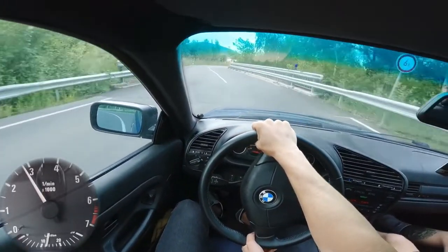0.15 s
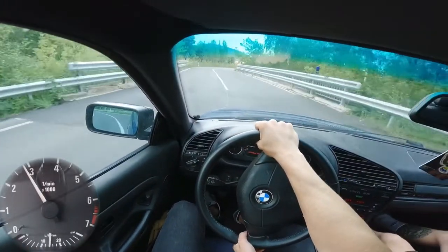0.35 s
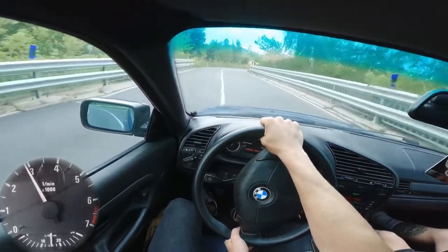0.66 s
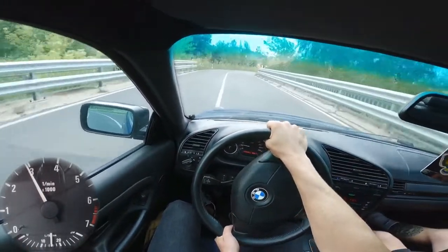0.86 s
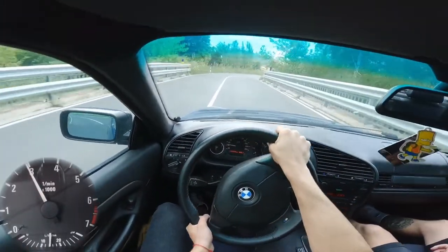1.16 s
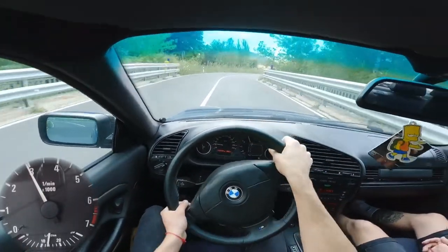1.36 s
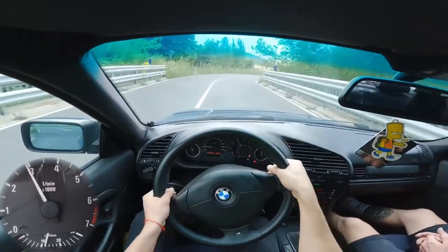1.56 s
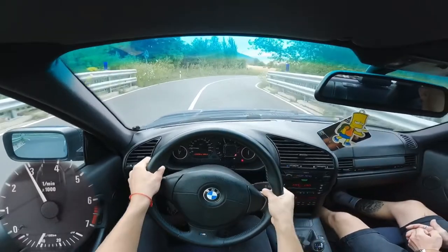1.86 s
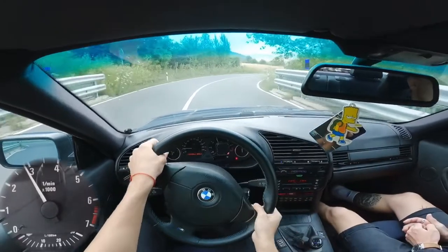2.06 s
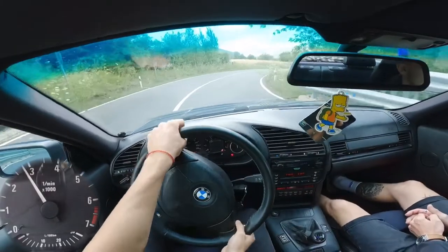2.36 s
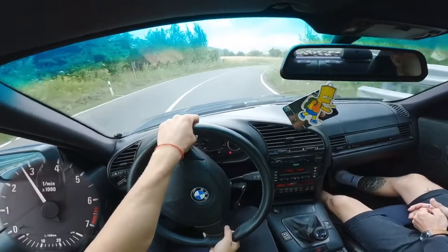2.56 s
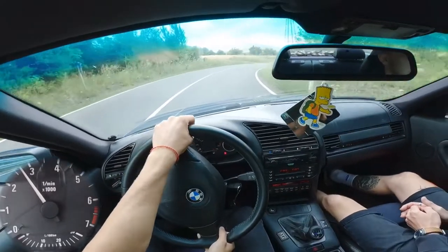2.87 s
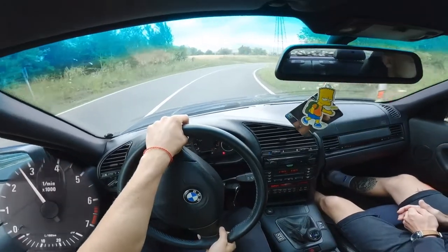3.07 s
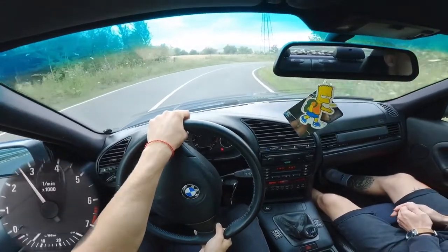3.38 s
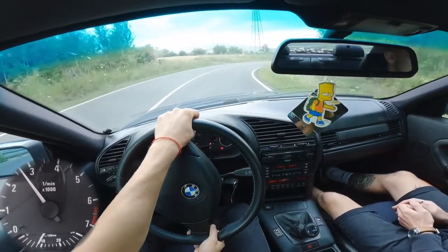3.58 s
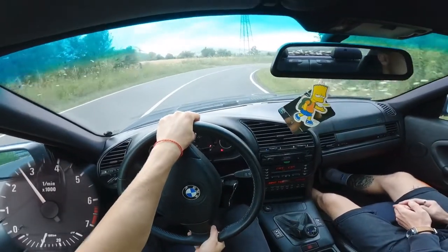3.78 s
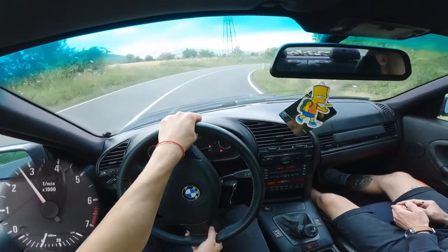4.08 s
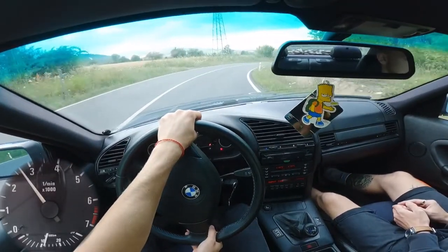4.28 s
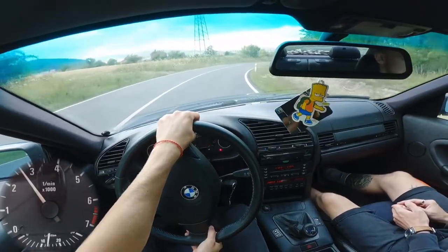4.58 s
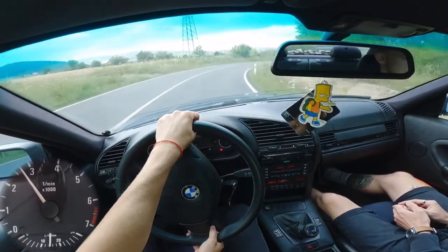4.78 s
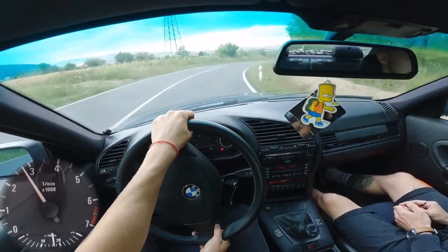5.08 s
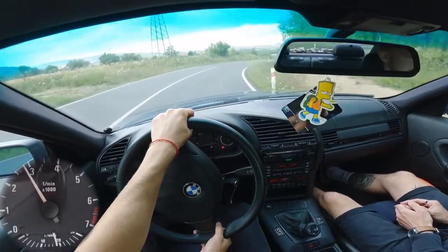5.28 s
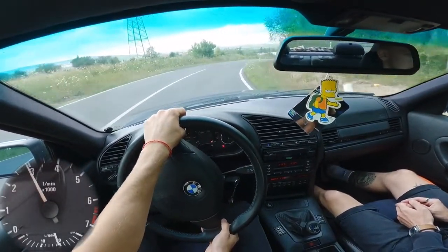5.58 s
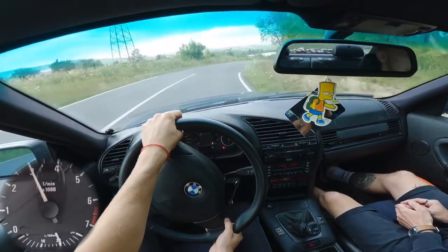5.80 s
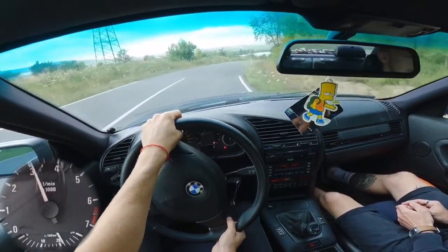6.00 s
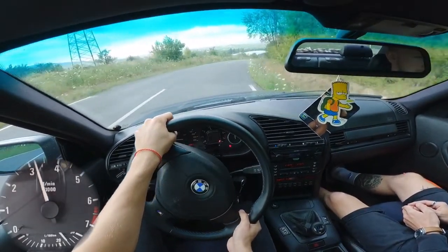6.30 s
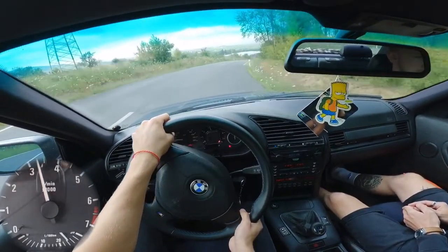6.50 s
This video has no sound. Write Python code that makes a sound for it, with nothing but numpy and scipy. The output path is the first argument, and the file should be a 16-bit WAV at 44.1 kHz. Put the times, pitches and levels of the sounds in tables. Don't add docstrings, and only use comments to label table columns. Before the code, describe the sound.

A boomy car interior: soft road rumble and air roar beneath a buzzing six-cylinder drone. Two dull knocks from the road come early, the second just before a stumbling, burbling throttle lift. The boom resumes and sags slightly in pitch, a shorter lift sputters into subdued coasting, and finally the engine gathers revs, growing louder, raspier and brighter until the end. Two microphone ports sit near the driver's head.

```python
import sys
import numpy as np
from scipy import signal
from scipy.io import wavfile
from scipy.ndimage import uniform_filter1d

SR = 44100
rng = np.random.default_rng(int(sys.argv[2]) if len(sys.argv) > 2 else 0)


def transcribe(signal):
    frames = np.atleast_2d(signal).T
    limited = np.clip(frames, -1, 1)
    pcm = np.round(limited * 32767).astype(np.int16)
    wavfile.write(sys.argv[1], SR, pcm)


def amplitude_ratio(level_db):
    exponent = np.asarray(level_db, float) / 20
    return 10 ** exponent


N = 293265
T = np.arange(N) / SR
COARSE = np.arange(0, N, 64)

# t/s, pulse rate of one three-cylinder bank f/Hz, firing boom level/dB,
# bank imbalance level/dB, effort level/dB
DRIVE = [(0, 70.9, -42.5, -40, -62), (.4, 73, -40, -37, -62), (.8, 73.34, -38, -35, -64),
         (1.15, 73.76, -36.5, -40, -61), (1.67, 72.23, -33, -43.5, -63), (2.2, 69.94, -34.5, -41, -66),
         (2.6, 68.16, -36, -41, -64.5), (3, 66.6, -38, -42, -67), (3.08, 67.26, -48.5, -50, -88),
         (3.6, 67.48, -45.5, -50.5, -84), (4, 67.88, -46, -48.5, -79), (4.4, 68.74, -43, -46.5, -74),
         (4.75, 69.8, -42, -39.5, -66), (5.2, 72.92, -38.5, -36.5, -61.5), (5.7, 77.43, -34.5, -34, -59),
         (6.1, 80.68, -30.5, -35.5, -55.5), (6.4, 83.8, -29, -36.5, -55), (6.65, 86.4, -29, -35, -53)]
# t/s, length/s, depth/0-1
LIFTS = [
    (1.179, 0.473, 0.88),
    (3.005, 0.301, 0.65),
]
# t/s, firing drop/dB, imbalance jump/dB, burble jump/dB
MISFIRES = [(1.19, 1.5, 7, 1.5), (1.225, 1.5, 4, 4), (1.272, 8, 0, 6), (1.325, 1.5, 3, 6),
            (1.385, 18, 0, 10), (1.45, 5, 18, 3), (1.5, 4, 4, 12), (1.53, 1.5, 6, 6), (1.565, 6, 0, 7),
            (1.625, 8, 9, 10), (3.045, 9, 6, 12), (3.07, 12, 19, 3), (3.11, 3, 4, 8), (3.165, 10, 0, 9),
            (3.24, 1.5, 11, 10)]
# multiple of the engine cycle (a third of the bank rate),
# light-load level/dB, full-load level/dB
CYCLE = [(4, 0, -2), (5, -5, -7), (7, -2, -3), (8, -7, -5), (10, -2, 1), (11, -5, -3), (13, -13, -9),
         (14, -11, -10), (16, -5, -13), (17, -12, -5), (19, -9, -14), (20, -12, -14), (21, -9, -5),
         (22, -16, -11), (23, -17, -18), (24, -9, -5), (25, -15, -13), (26, -14, -16), (27, -13, -8),
         (28, -17, -14), (29, -17, -12), (30, -5, -12), (31, -10, -14), (32, -19, -12), (33, -12, -8),
         (34, -11, -15), (35, -21, -14), (36, -15, -6), (39, -3, -9), (42, -17, -9)]
# multiple of the bank rate, no-load level/dB, full-load gain/dB, lift loss/dB, waver/1
MINOR_ORDERS = [
    (1, -44.5, -2.5, -0.5, 0.14),
    (4, -49.5, 6, 10, .027),
    (5, -55, -1, 1, 0.058),
    (6, -59.5, 6, 1.5, 0.1),
]
# f/Hz, level/dB
FLOOR_PAN = [(260, -1), (278, -2), (297, -5), (315, -12), (340, 1), (365, 0.5), (408, 8), (470, -14.5)]
# f/Hz, width/Hz, gain/dB
CABIN = [(230, 30, 6), (408, 25, 14), (595, 40, 6), (680, 30, 3), (760, 32, 19), (792, 24, 16),
         (975, 45, 9), (1200, 45, 7), (1614, 30, 14), (2280, 70, 8), (2390, 50, 7), (3230, 150, 5),
         (4050, 200, 9), (4600, 130, 12), (4790, 110, 14), (5240, 130, 8), (6416, 70, 6), (8850, 300, 6)]
# f/Hz, level/dB per Hz
RASP = [(400, -29), (650, -3), (1150, -4), (1400, -9.5), (2000, -6), (2400, -12), (2600, -15.5),
        (5200, -26.5), (5700, -26), (8000, -54.5)]
# f/Hz, level/dB per Hz
HISS = [(2000, -35.5), (4000, -11.5), (5500, -10.5), (9000, -11.5), (11300, -14.5), (12000, -28),
        (16000, -57)]
# t/s, hiss level/dB, length/s, thud level/dB
PUFFS = [
    (1.375, -62, 0.021, -42.5),
    (1.447, -69, 0.011, -58),
    (1.536, -66, 0.036, -54),
    (1.556, -69, 0.0065, -57),
    (1.62, -72, 0.03, -43),
    (3.02, -65, 0.025, -48),
    (3.202, -74, .012, -69),
    (3.28, -88, 0.024, -62),
]
# f/Hz, level/dB per Hz
PUFF_AIR = [(1500, -22), (2200, 0), (4500, -1.5), (6000, -3.5), (9000, -3.5), (11300, -6.5), (12000, -43),
            (16000, -51)]
# f/Hz, level/dB per Hz
PUFF_THUD = [(300, -21), (450, 4), (750, -0.5), (1100, -22), (2000, -11.5), (3000, -21)]
# t/s, tick level/dB, tick f/Hz, thump level/dB, thump f/Hz, thump delay/s
JOINTS = [
    (.708, -41, 960, -31, 100, 0.013),
    (1.162, -35.5, 990, -29.5, 102, 0.01235),
]
# f/Hz, level/dB per Hz
TRIM_RATTLE = [(750, -25), (950, 0), (1200, -4), (1700, -7), (2000, -25)]
# f/Hz, level/dB per Hz
RUMBLE = [(5, -34), (20, -8.5), (45, -6.5), (70, -4.5), (100, 6.5), (140, -11), (230, 0), (330, -7),
          (500, -28.5), (700, -45.5)]
# f/Hz, level/dB per Hz
BURBLE = [(8, -29.5), (25, -8), (45, 7), (75, 4), (105, -2), (180, 9.5), (260, -9), (400, -4), (600, -31),
          (900, -28), (1500, -44)]
# f/Hz, level/dB per Hz
LURCH = [(20, -20), (32, -5), (42, 0), (55, -4), (70, -20)]
# f/Hz, level/dB per Hz
ROAR = [(200, -41), (350, 0), (600, -4), (1100, 0.5), (1350, -11), (2000, -10), (2400, -19.5), (2600, -20),
        (5300, -28), (6000, -31.5), (11500, -35), (15200, -36), (15600, -59.5)]
# f/Hz, phase/rad
PORT_LEAD = [(40, .1), (70, .28), (140, -.1), (215, -.15), (290, -.55), (420, -.4), (1100, 0)]
# f/Hz, likeness/0-1
PORT_LIKENESS = [(35, 0.94), (75, 0.66), (200, 1), (600, 0.59), (1500, 0.82), (3500, 0.72), (7000, 0.36),
                 (15000, 0.19)]
# f/Hz, level/dB
PORT_TILT = [(60, 3.5), (130, 1.5), (290, -3.5), (640, -5.5), (1410, 1), (3100, 0.5), (6810, -1.5),
             (15000, -1.5)]

PORT_LAG_S = 2 / SR
RUMBLE_DB, BURBLE_DB, LURCH_DB, ROAR_DB = -49, -45.5, -49, -58
LIFT_EDGE_S, MISFIRE_S = 0.044, 0.016
IDLE_LOAD, LOAD_PER_HZ_S, INERTIA_S = 0.41, 0.22, 0.36
FIRING_LOSS_DB, IMBALANCE_LOSS_DB, COMB_LOSS_DB = 0.5, 13.5, 2
COMB_DB, COMB_SHARE, COMB_LIGHT_DB = -61, 0.23, -1
TOP_DB, TOP_FALL_DB, TOP_BANK_DB = -18.5, 0.55, 2.5
PART_THROTTLE_DB = 7
PEDAL_DOWN_S, PEDAL_S = 4.45, 0.5
GROWL_FROM_HZ, GROWL_DB_PER_HZ = 76.6, 0.3
HISS_FROM_HZ, HISS_SPAN_HZ, HISS_DB, HISS_GAIN_DB = 69.8, 12.2, -89, 25
NULL_HZ, NULL_WIDTH_HZ, NULL_DB = 438, 13, 9
NARROW_HZ, BUSY_FROM_HZ = 11800, 6000
BUSY_DB, BUSY_SPAN_DB, BUSY_RAGGED_DB = -79.5, 3, 2.5


def read(points, hz):
    f, value = np.transpose(points)
    return np.interp(np.log(hz + 1), np.log(f + 1), value)


def curves(rows):
    s, *columns = np.transpose(rows)
    return [np.interp(T, s, column) for column in columns]


def wander(per_s):
    steps = rng.standard_normal(int(N / SR * per_s) + 2)
    return np.interp(COARSE / SR * per_s, np.arange(len(steps)), steps)


def swell(s, length, rise=0.2):
    u = np.maximum(T - s, 0) / length
    return np.tanh(u / rise) * np.exp(-1.5 * u ** 2)


def port(hz):
    phase = read(PORT_LEAD, hz) - 2 * np.pi * hz * PORT_LAG_S * (hz > 1000)
    return amplitude_ratio(read(PORT_TILT, hz) / 2) * np.exp(0.5j * phase)


def cabin_db(hz, share):
    power = 0
    for f, width, db in CABIN:
        power = power + amplitude_ratio(2 * share * db) / (1 + ((hz - f) / width) ** 2 * np.sqrt(3)) ** 2
    return 10 * np.log10(1 + power)


def noise(colour, ringing, patchy_db, size=1024):
    frames, hz = 4 * N // size + 9, np.fft.rfftfreq(size, 1 / SR)
    a, b, c, d, patches = rng.standard_normal((frames, len(hz), 5)).T
    patches = uniform_filter1d(uniform_filter1d(patches, size=8, axis=0), size=8, axis=1)
    patches = patches / np.sqrt(np.mean(patches ** 2) + 1e-20)
    same = np.clip(read(PORT_LIKENESS, hz) + 0.03, 0, 1)[:, None]
    left = a + 1j * b
    right = same * left + np.sqrt(1 - same ** 2) * (c + 1j * d)
    side = port(hz)[:, None]
    spectra = np.array([left * side, right / side])
    spectra *= amplitude_ratio((read(colour, hz) + cabin_db(hz, ringing))[:, None] + patchy_db * patches)
    spectra[:, (hz < colour[0][0]) | (hz > colour[-1][0])] = 0
    out = signal.istft(spectra, nperseg=size, noverlap=3 * size // 4)[1][:, size:N + size]
    return out / np.sqrt(np.mean(out.mean(0) ** 2))


def lifted():
    share = 0
    for s, length, depth in LIFTS:
        inside_s = np.minimum(T - s, s + length - T)
        share = share + depth * np.clip(inside_s / LIFT_EDGE_S + 0.5, 0, 1)
    jumps = sum(np.outer(db, np.exp(-0.5 * ((T - s) / MISFIRE_S) ** 2)) for s, *db in MISFIRES)
    return share, *jumps


def road():
    rumble = amplitude_ratio(RUMBLE_DB) * noise(RUMBLE, 0.092, 0.2, size=4096)
    return rumble + amplitude_ratio(ROAR_DB) * noise(ROAR, 0.027, 0.93)


def joints():
    knocks, rattle = np.zeros(N), np.zeros(N)
    for s, tick_db, tick_hz, thump_db, thump_hz, late in JOINTS:
        u = np.maximum(T - s, 0)
        knocks += amplitude_ratio(tick_db) * u / 0.0036 * np.exp(1 - u / 0.0029) * np.sin(2 * np.pi * tick_hz * u)
        rattle += amplitude_ratio(tick_db - 6.0) * swell(s - 0.014, 0.032, rise=0.54)
        u = np.maximum(u - late, 0)
        knocks += amplitude_ratio(thump_db) * u / 0.011 * np.exp(1 - u / 0.014) * np.sin(2 * np.pi * thump_hz * u)
    opposed = amplitude_ratio([[0.7], [-0.7]])
    return knocks * opposed + rattle * noise(TRIM_RATTLE, 0.3, 2.3, size=256)


def lift_burble():
    lift, _, _, burble_db = lifted()
    burble = lift * amplitude_ratio(BURBLE_DB + burble_db) * noise(BURBLE, 0.35, 4.3, size=2048)
    return burble + lift * amplitude_ratio(LURCH_DB + 0.6 * burble_db) * noise(LURCH, 0, 1, size=4096)


def puffs():
    air = sum(amplitude_ratio(db) * swell(s - 0.002, length) for s, db, length, _ in PUFFS)
    thud = sum(amplitude_ratio(db) * swell(s - 0.004, 0.9 * length, rise=0.36) for s, _, length, db in PUFFS)
    return air * noise(PUFF_AIR, 0.4, 1.5, size=256) + thud * noise(PUFF_THUD, 0.49, 2.1)


def order(multiple, level_db, bank_hz, turns, unsteady, start):
    side = port(multiple * bank_hz[COARSE]) * (1 + 0.07 * (wander(3) + 1j * wander(3)))
    slow = wander(18) + 1j * wander(18)
    fast = wander(45) + 1j * wander(45)
    waver = 1 + unsteady * np.where(unsteady > 0.5, fast, slow)
    size = np.sqrt(2) * amplitude_ratio(level_db[COARSE]) * waver / np.sqrt(1 + unsteady ** 2)
    spin = np.exp(2j * np.pi * (multiple * turns + start))
    return np.array([(np.interp(np.arange(N), COARSE, size * p) * spin).real for p in (side, 1 / side)])


def low_orders(bank_hz, turns, load, part_db, firing_db, banks_db):
    lift, drop_db, jump_db, _ = lifted()
    orders = [(2, firing_db - FIRING_LOSS_DB * lift - drop_db, 0.019),
              (3, banks_db - IMBALANCE_LOSS_DB * lift + jump_db, 0.011)]
    for k, db, gain_db, loss_db, waver in MINOR_ORDERS:
        level_db = db + gain_db * load - loss_db * lift - part_db * (k == 5)
        orders.append((k, level_db + read(FLOOR_PAN, k * bank_hz), waver))
    broken = 0.31 * lift[COARSE]
    return sum(order(k, db, bank_hz, turns, waver + broken, rng.random()) for k, db, waver in orders)


def cycle_comb(bank_hz, turns, load, part_db, effort_db):
    broken, out = lifted()[0][COARSE], 0
    upper_db = COMB_DB + COMB_SHARE * (effort_db + 67.5) + COMB_LIGHT_DB * (1 - load)
    top = []
    for k in range(45, 61):
        db = TOP_DB - TOP_FALL_DB * (k - 45) + TOP_BANK_DB * (k % 3 == 0)
        top.append((k, db, db))
    for k, light_db, full_db in list(CYCLE) + top:
        hz = k / 3 * bank_hz[COARSE]
        rings_db = cabin_db(hz, 0.88) + wander(0.46) - COMB_LOSS_DB * broken
        rings_db -= NULL_DB * np.exp(-((hz - NULL_HZ) / NULL_WIDTH_HZ) ** 2)
        level_db = upper_db - part_db * (k % 3 == 0) + (1 - load) * light_db + load * full_db
        level_db = level_db + np.repeat(rings_db, 64)[:N]
        start = 0.3 * rng.standard_normal()
        out = out + order(k / 3, level_db, bank_hz, turns, 0.1 + 3 * broken, start)
    return out


def firing_noise(bank_hz, turns, floored, effort_db):
    angle = 2 * np.pi * turns
    firing = 1 + 0.089 * np.cos(2 * angle) + 0.067 * np.cos(angle) + 0.054 * np.cos(angle / 3)
    rasp = amplitude_ratio(effort_db + 2.5) * firing * noise(RASP, 0.79, 1.5, size=2048)
    hiss_db = HISS_DB + HISS_GAIN_DB * np.tanh((bank_hz - HISS_FROM_HZ) / HISS_SPAN_HZ)
    return rasp + floored * amplitude_ratio(hiss_db) * firing * noise(HISS, 0.7, 1.4)


def engine():
    bank_hz, firing_db, banks_db, effort_db = curves(DRIVE)
    turns = np.cumsum(bank_hz) / SR
    gain_hz_s = uniform_filter1d(np.gradient(bank_hz) * SR, int(INERTIA_S * SR))
    load = np.clip(IDLE_LOAD + LOAD_PER_HZ_S * gain_hz_s, 0, 1)
    floored = np.clip((T - PEDAL_DOWN_S) / PEDAL_S, 0, 1)
    outside_overrun = (T < sum(LIFTS[0][:2])) | (T > LIFTS[1][0] + 0.05)
    part_db = PART_THROTTLE_DB * (1 - floored) * outside_overrun
    part_db -= GROWL_DB_PER_HZ * floored * np.maximum(bank_hz - GROWL_FROM_HZ, 0)
    out = low_orders(bank_hz, turns, load, part_db, firing_db, banks_db)
    out += cycle_comb(bank_hz, turns, load, part_db, effort_db)
    return out + firing_noise(bank_hz, turns, floored, effort_db)


def scene():
    return road() + joints() + lift_burble() + puffs() + engine()


def roll_off(x):
    return signal.sosfilt(signal.butter(12, 15590, fs=SR, output="sos"), x)


def highpassed(padded, hz):
    taps = signal.firwin(401, hz, window=("kaiser", 8), pass_zero=False, fs=SR)
    return signal.oaconvolve(padded, taps[None], "valid")


def record(dry):
    fade = np.minimum(np.arange(N) / (0.006 * SR), 1)
    padded = np.pad(dry, ((0, 0), (200, 200)), "reflect", reflect_type="odd")
    top, treble = highpassed(padded, NARROW_HZ), highpassed(padded, BUSY_FROM_HZ)
    busy_db = 10 * np.log10(abs(uniform_filter1d(treble.mean(0) ** 2, size=2000)) + 1e-14)
    busy_db += BUSY_RAGGED_DB * np.repeat(wander(30), 64)[:N]
    kept = dry - top * np.clip((busy_db - BUSY_DB) / BUSY_SPAN_DB, 0, 1)
    return roll_off(kept * fade)


dry = scene()
out = record(dry)
transcribe(out)
```